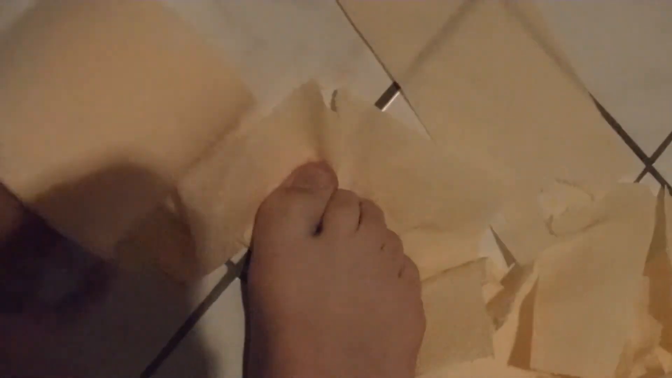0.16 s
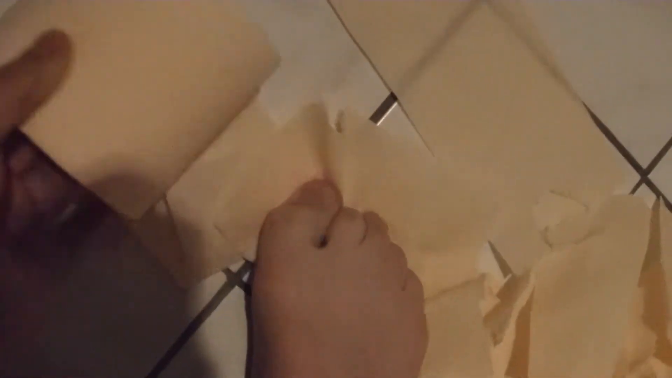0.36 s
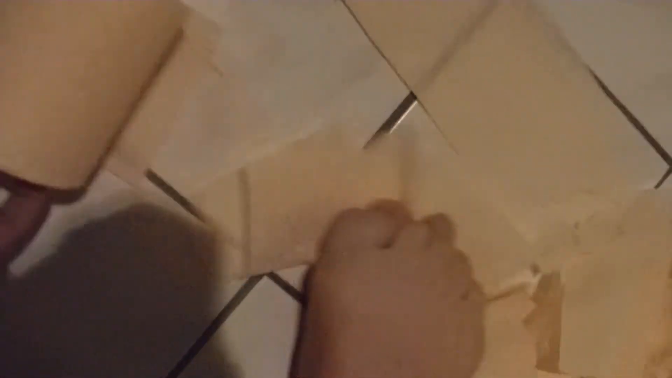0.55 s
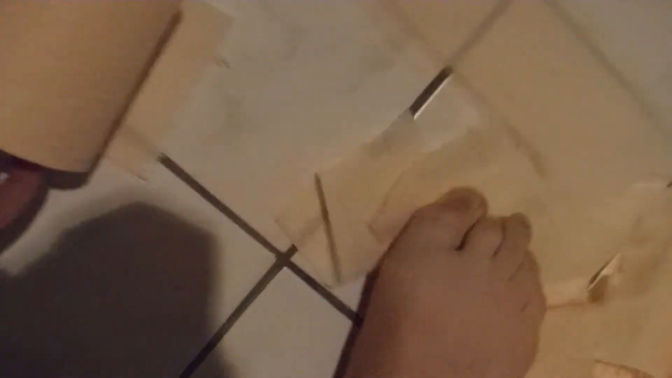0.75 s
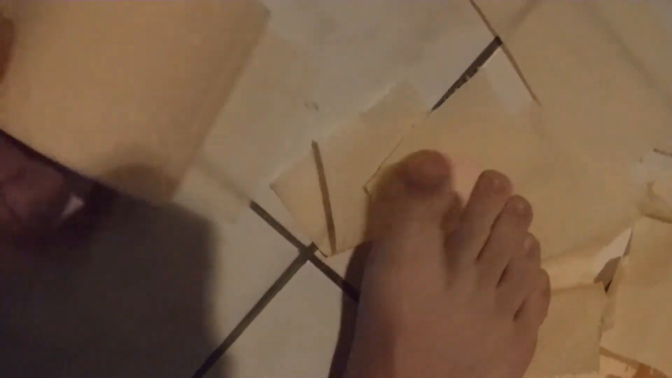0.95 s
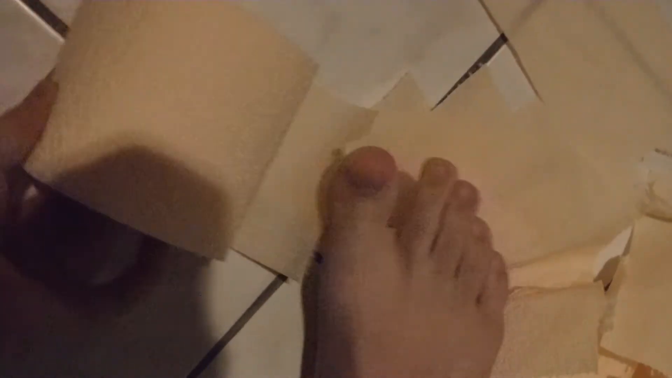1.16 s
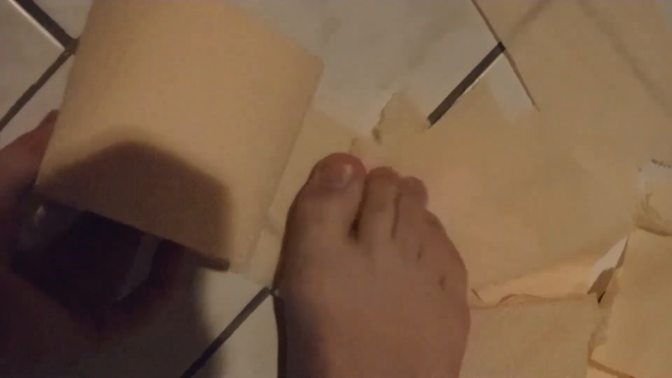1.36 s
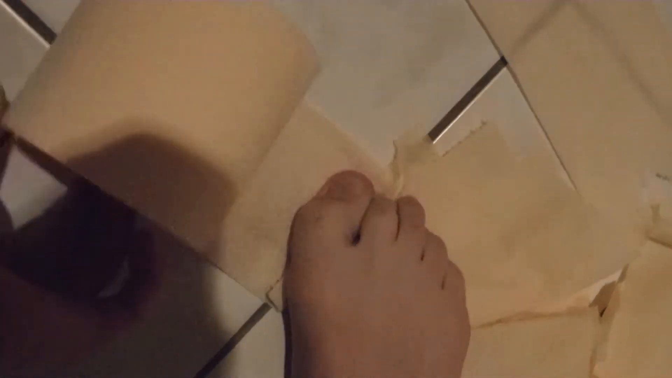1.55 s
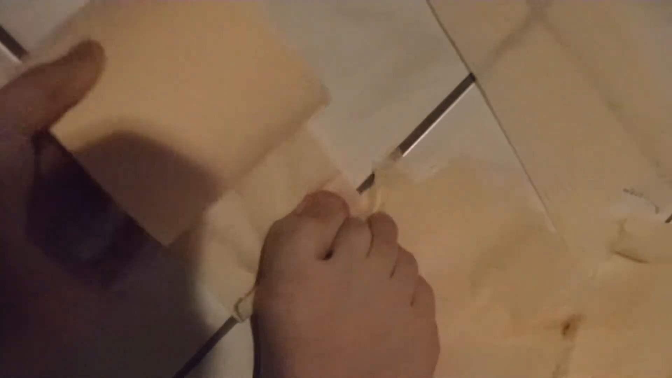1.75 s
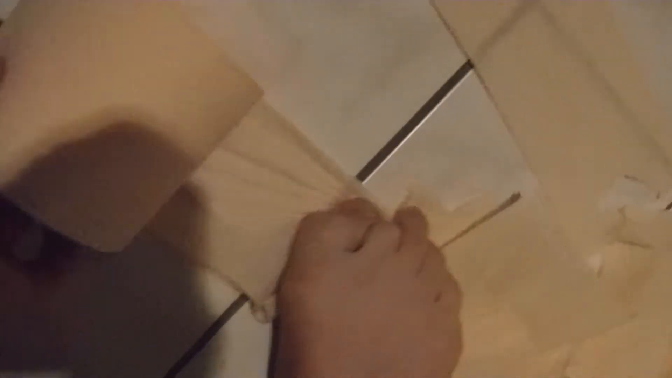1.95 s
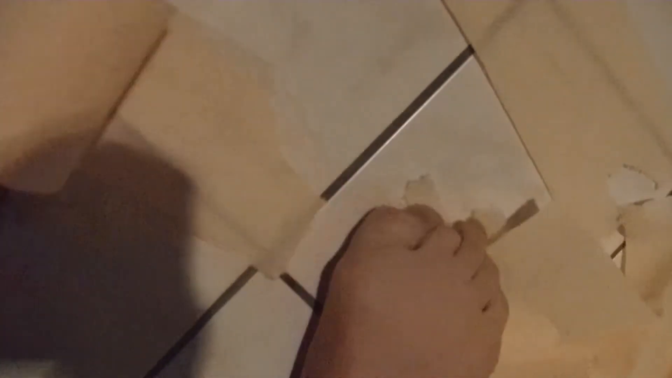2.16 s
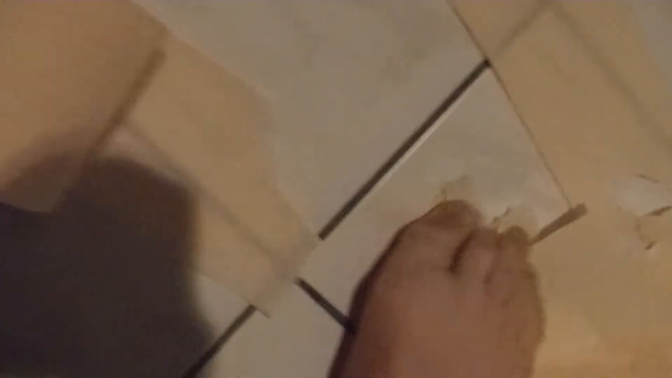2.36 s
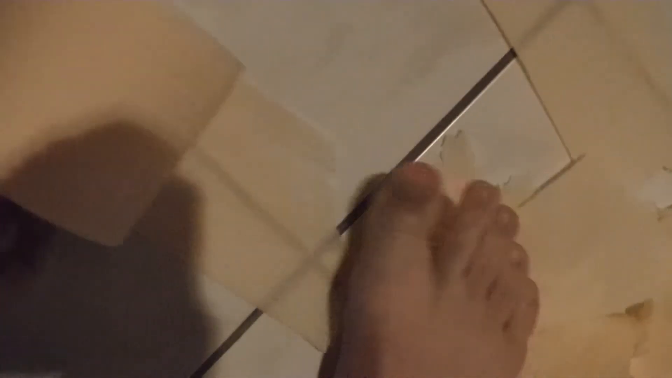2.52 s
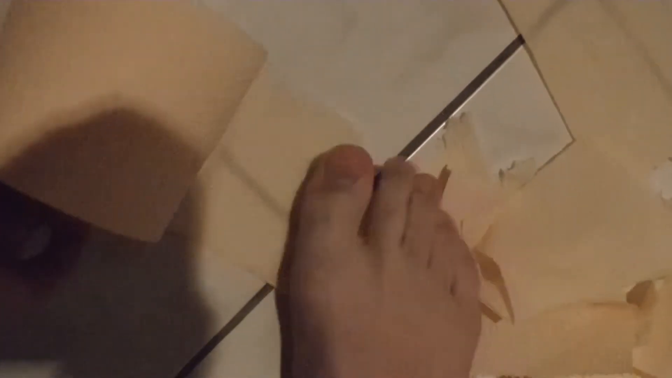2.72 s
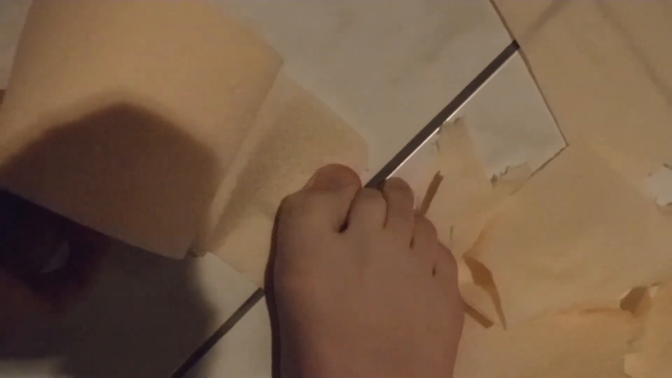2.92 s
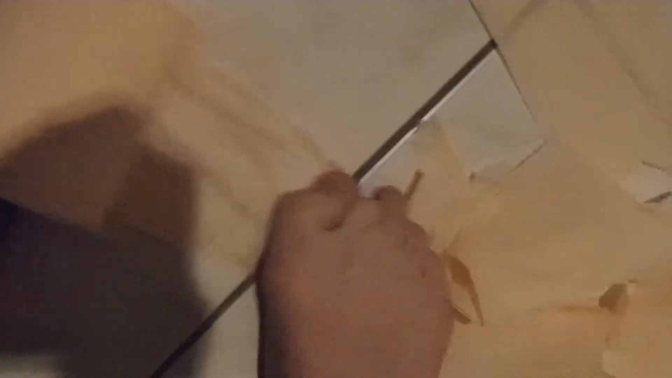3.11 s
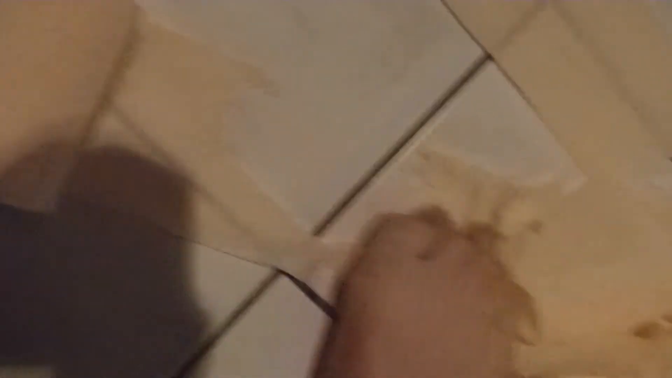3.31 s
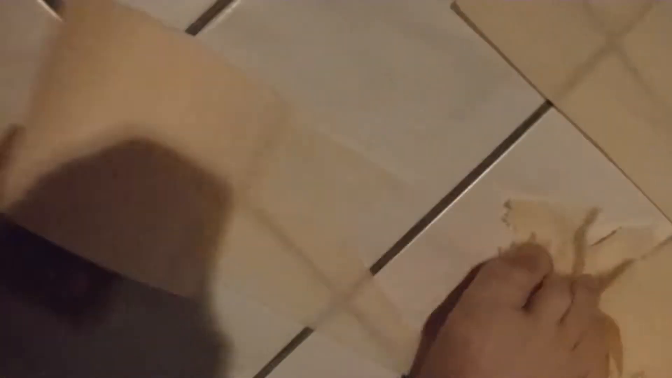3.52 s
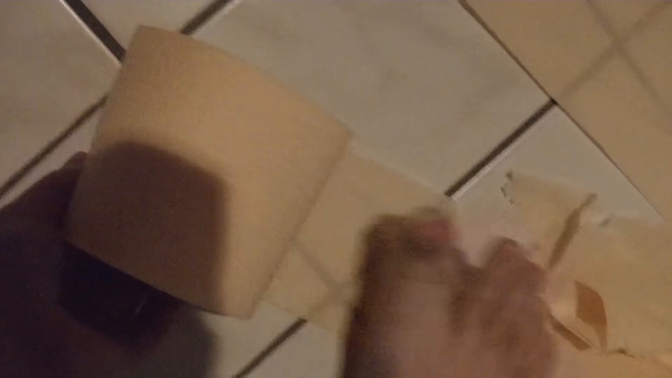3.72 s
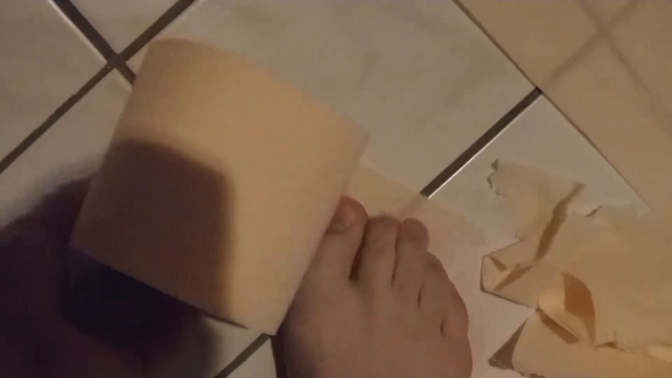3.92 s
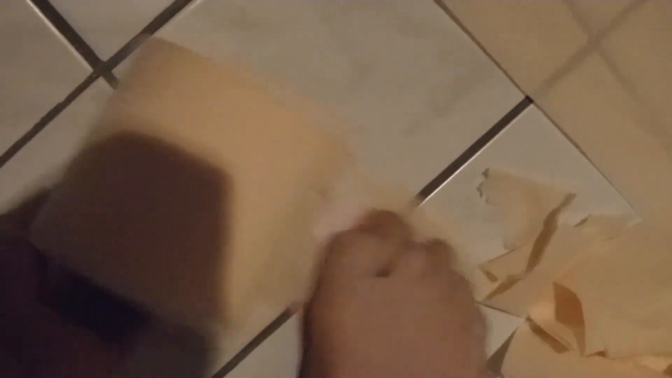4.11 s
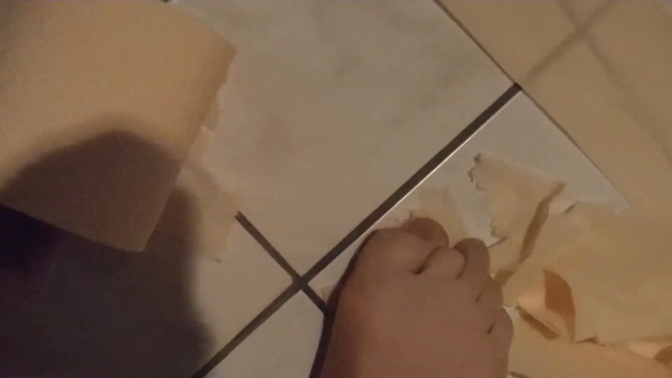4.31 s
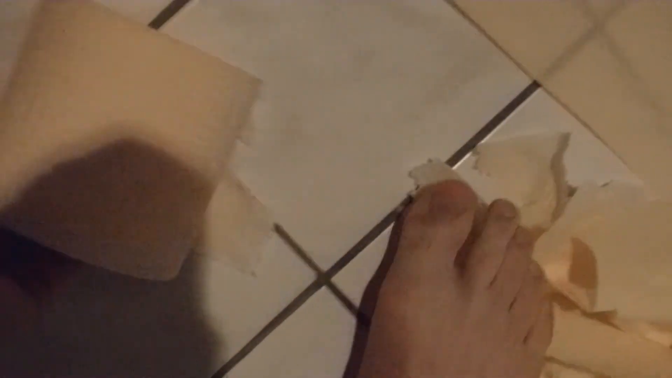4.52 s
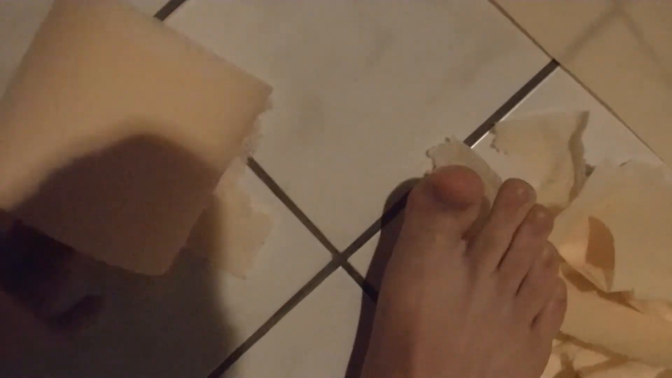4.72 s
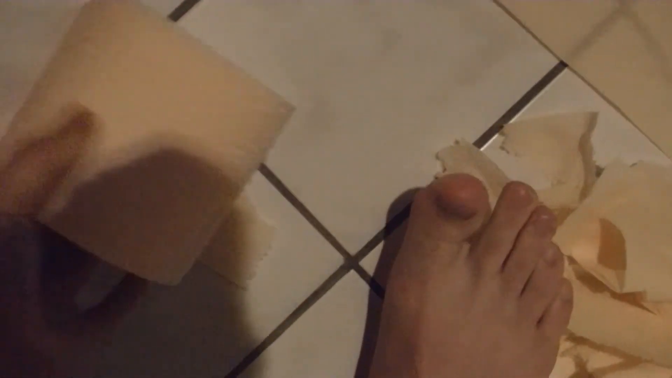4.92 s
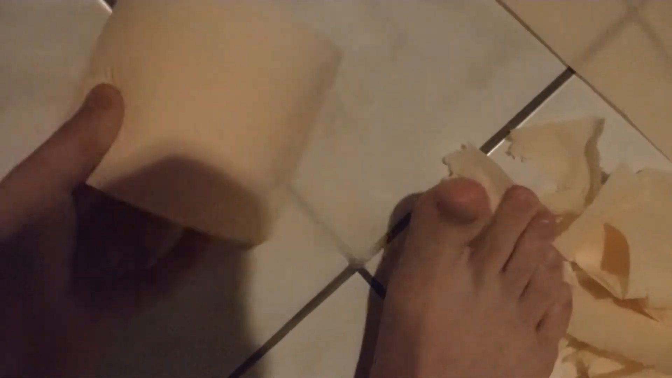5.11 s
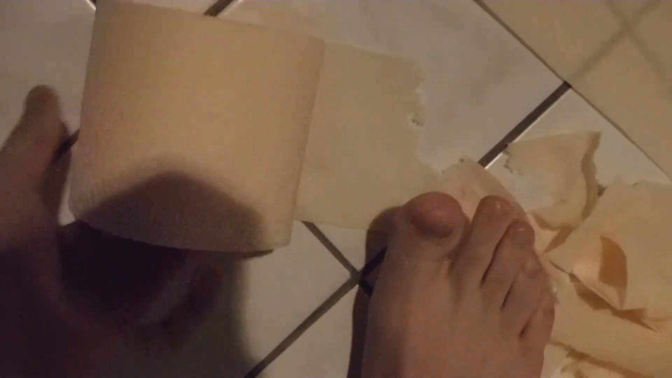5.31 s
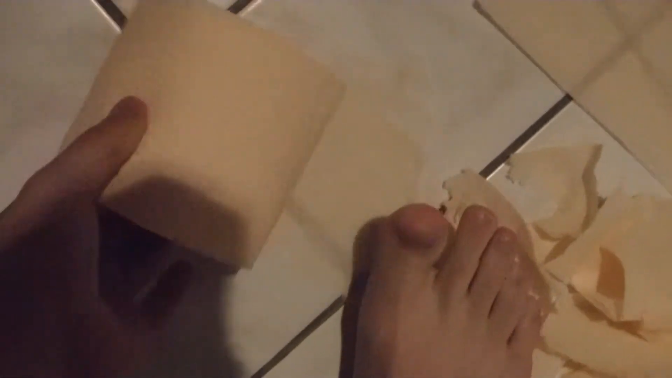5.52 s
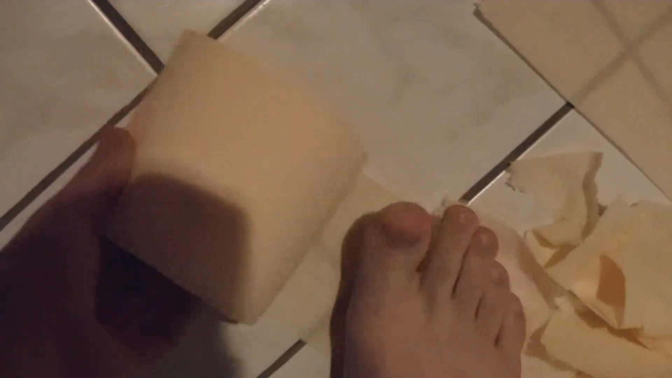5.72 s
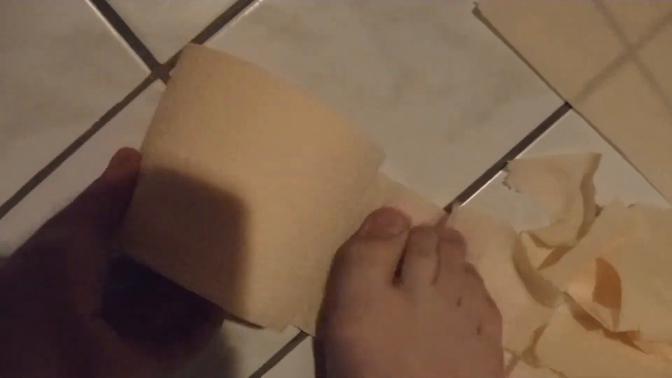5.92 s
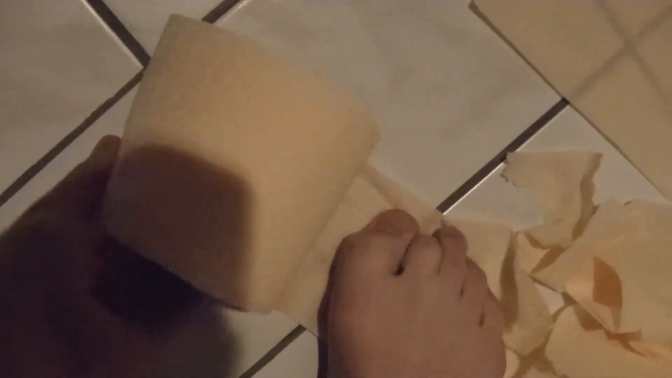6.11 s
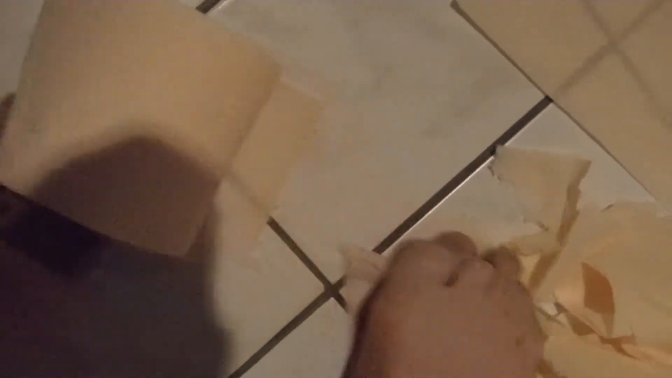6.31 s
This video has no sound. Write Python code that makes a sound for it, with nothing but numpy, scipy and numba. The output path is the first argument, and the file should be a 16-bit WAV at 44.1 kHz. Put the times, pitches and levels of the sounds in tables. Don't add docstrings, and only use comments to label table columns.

```python
import sys
import numpy as np
from scipy import signal
from scipy.fft import rfft, irfft
from scipy.io import wavfile
from scipy.ndimage import uniform_filter1d
from numba import njit

SR = 44100
rng = np.random.default_rng(int(sys.argv[2]) if len(sys.argv) > 2 else 0)


def to_linear_factor(level_db):
    exponent = np.asarray(level_db, float) / 20
    return 10 ** exponent


def dump(signal):
    limited = np.clip(np.atleast_2d(signal).T, -1, 1)
    pcm = np.round(limited * 32767).astype(np.int16)
    wavfile.write(sys.argv[1], SR, pcm)


N = 284886

BRIGHT_SHARE = (-.51, -.15, .2, .51)


def colour(x, points):
    hz, db = np.transpose(points)
    log_hz = np.log(np.fft.rfftfreq(2048, 1 / SR) + 1)
    log_gain = np.interp(log_hz, np.log(hz), db) * np.log(10) / 20
    ceps = irfft(log_gain)
    ceps[1:1024] *= 2
    ceps[1025:] = 0
    impulse = irfft(np.exp(rfft(ceps)))
    return signal.oaconvolve(x, impulse)[:len(x)]


def band(x, lo_hz, hi_hz):
    return signal.sosfilt(signal.butter(2, (lo_hz, hi_hz), "band", fs=SR, output="sos"), x)


def ring(x, modes):
    return sum(to_linear_factor(db) * signal.lfilter(*signal.iirpeak(hz, hz / width, SR), x) for hz, width, db in modes)


def steep(x, modes):
    return sum(ring(ring(x, [mode]), [(*mode[:2], 0)]) for mode in modes)


def unit(x):
    return x / np.sqrt(np.mean(x ** 2))


def walk(rate):
    hold = int(SR / rate)
    levels = np.repeat(rng.standard_normal(N // hold + 1), hold)
    return 1.19 * uniform_filter1d(levels, hold)[:N]


def slopes(t, peak_s, rise_db_s, fall_db_s):
    return -rise_db_s * np.maximum(peak_s - t, 0) - fall_db_s * np.maximum(t - peak_s, 0)


def hiss():
    # frequency in Hz, hiss density in dB per Hz.
    hiss_colour = [(22, -24.5), (160, -8), (235, 0), (1000, 1.5), (2000, -0.5), (3000, -6.5), (5000, -7.5),
                   (8000, -18), (12000, -16), (15800, -24)]
    # frequency in Hz, width in Hz, level in dB.
    murmur_modes = [(98, 9.4, -6), (165.6, 9.7, -5), (233, 3.5, 10.5), (303, 12, -1), (380, 22, -5)]
    hiss_db, murmur_db = -61, -75.5
    mid, side = (unit(colour(rng.standard_normal(N), hiss_colour)) for _ in range(2))
    rumble = to_linear_factor(murmur_db) * unit(ring(rng.standard_normal(N), murmur_modes))
    return to_linear_factor(hiss_db) * np.array([mid + 1.48 * side, mid - 1.27 * side]) + rumble


def motor():
    # start in seconds, length in seconds, level in dB.
    runs = [(0.066, 0.194, -2.5), (0.33, 0.053, -1), (0.45, 0.162, 0), (0.666, 0.057, 2),
            (0.83, 0.064, 0.5), (0.983, 0.127, -0.5), (1.23, 0.15, -1), (1.544, 0.045, 1.5),
            (1.64, 0.07, -1), (1.858, 0.041, 2), (2.39, 0.197, 0), (2.688, 0.055, -4), (2.775, 0.05, 0),
            (3.009, 0.093, -1), (3.106, 0.11, 2.5), (3.502, 0.038, 1.5), (3.623, 0.077, -1.5),
            (3.764, 0.024, 0), (3.839, 0.031, -3), (3.912, 0.09, -2), (4.292, 0.13, -3), (4.473, 0.078, 3),
            (4.852, 0.018, 1), (5.022, 0.038, 4), (5.162, 0.053, 7), (5.269, 0.047, 2), (5.41, 0.062, 1.5),
            (5.59, 0.095, 0), (5.978, 0.17, -3), (6.383, 0.037, 0.5)]
    # frequency in Hz, width in Hz, level in dB.
    body_modes = [(2120, 230, -1.5), (3990, 400, -1.5), (9610, 620, 1.1), (11500, 550, -5), (6600, 410, -8)]
    motor_db, step_hz, tick_db = -61.5, 71.6, 7
    frame_s, first_tick_s = .04, .03
    t = np.arange(N) / SR
    running = sum(to_linear_factor(db) * ((t > s) & (t < s + length)) for s, length, db in runs)
    steps = 1 + 0.14 * np.cos(2 * np.pi * step_hz * (t - first_tick_s))
    ticks = to_linear_factor(tick_db) * np.exp(-((t - first_tick_s + 0.003) % frame_s) / .003)
    tick_strength = .75 + .4 * uniform_filter1d(running, size=2600)
    drive = uniform_filter1d(running, size=90) * steps + ticks * tick_strength
    shake, other = (unit(steep(drive * rng.standard_normal(N), body_modes)) for _ in range(2))
    return to_linear_factor(motor_db) * np.array([shake + .5 * other, shake - .5 * other])


@njit
def walls(x, lags, gain, damp):
    line, soft, out = np.zeros((8, 4096)), np.zeros(8), np.zeros((2, len(x)))
    for i in range(len(x)):
        total = 0.
        for k in range(8):
            soft[k] += (1 - damp) * (gain[k] * line[k, (i - lags[k]) & 4095] - soft[k])
            total += soft[k]
            out[k % 2, i] += soft[k]
        for k in range(8):
            line[k, i & 4095] = x[i] + soft[k] - total / 4
    return out


def tiles(x):
    t60_s, damp, room_db = 0.27, .2, -14.5
    lags = np.array([331, 457, 563, 677, 811, 953, 1093, 1259])
    gain = to_linear_factor(-60 * lags / SR / t60_s)
    return to_linear_factor(room_db) * walls(x + 1e-18, lags, gain, damp)


def rubs():
    # start in seconds, length in seconds, resonance in Hz, width in Hz, level in dB.
    rub_rows = [(0.051, 0.073, 6600, 900, -53.5), (0.139, 0.076, 4880, 148.1, -50),
                (0.163, 0.034, 9600, 6480, -44.5), (0.339, 0.012, 4050, 320, -50),
                (.44, .09, 4120, 500, -53), (0.768, 0.041, 3450, 55.56, -64), (1.41, 0.13, 6600, 830, -59),
                (1.541, .03, 11100, 8000, -52), (1.758, 0.11, 1346, 220, -55),
                (2.297, 0.015, 9300, 9100, -33), (2.376, 0.46, 1377, 200, -62),
                (2.398, 0.47, 550, 220, -65), (4.643, .05, 6500, 1300, -54),
                (4.639, 0.06, 11900, 3200, -49), (4.72, .22, 1390, 320, -57), (4.745, 0.11, 301, 40, -67),
                (3.16, 0.2, 238, 80, -66), (6.213, 0.12, 233, 30, -58), (3.144, 0.056, 1290, 260, -41),
                (4.834, 0.11, 6200, 2200, -63), (5.14, 0.086, 6600, 900, -59)]
    out = np.zeros(N)
    for s, length, hz, width, db in rub_rows:
        count = int(length * SR)
        grit = rng.standard_normal(SR // 2)[:count] * signal.windows.tukey(count, .7)
        out[int(s * SR):][:count] += to_linear_factor(db) * unit(steep(grit, [(hz, width, 0)]))
    return out * to_linear_factor(1.6 * walk(70))


def rustle_power(t, layer):
    # time in seconds, effort in dB, brightness in dB.
    handling = [(0, -53, 3), (.1, -56, 14), (.29, -59, 7), (.7, -62, 11), (1.08, -65, 1), (1.33, -68, 3),
                (1.62, -63, 8), (2.02, -58, 8), (2.37, -57, 3), (2.65, -64, -2.1), (3.0, -73, 12),
                (3.5, -62, 8), (3.75, -72, 9), (4.0, -71, 3), (4.45, -59, 5), (4.92, -65, -5),
                (5.37, -72, 11), (6.46, -62, 13)]
    # loudest moment in seconds, level in dB,
    # seconds to fade 10 dB, brightness in dB, body in dB.
    swishes = [(.18, -46, .07, 10, -3), (.47, -53, .07, 9, 1.5), (.83, -56, .15, 3, -1.5),
               (1.44, -56, .05, 13, .1), (1.49, -58, .05, 11, 1.5), (1.7, -57, .08, 1.1, -1.5),
               (1.8, -54, .06, 5, 1.5), (1.89, -54.5, .1, 7, 1.1), (2.78, -63, .05, -5, 1.5),
               (3.065, -53, .035, 3, 1.1), (3.27, -44, .07, 3, 1.5), (3.37, -50, .07, 6, .1),
               (4.1, -49, .042, 6, .6), (4.3, -60, .05, 12, -2.1), (4.518, -53, .04, 14, 5),
               (4.83, -62, .11, -10, 4), (5.04, -57, .07, 8, 3), (5.11, -59, .05, 13, -1.1),
               (5.19, -54, .06, 12, -2.1), (5.53, -57, .08, 13, 3.5), (5.66, -53.5, .04, 13, -1.5),
               (5.74, -62, .04, 14, -1.5), (5.97, -60, .04, 8, 2.1), (6.12, -52.5, .045, 5, 2.1)]
    # peak in seconds, level in dB, seconds to fade 10 dB,
    # brightness in dB, body in dB.
    creases = [(.345, -54, .03, 11, -2.1), (.494, -46, .035, 5, 3), (1.09, -61, .09, -13, -4),
               (1.205, -63, .02, 14, .1), (1.268, -57, .03, 12, -2.1), (1.54, -54, .04, 14, 2.1),
               (2.05, -47, .02, -3, .1), (2.302, -49, .045, 14, -3), (3.352, -49, .008, 9, .1),
               (3.379, -49, .008, 12, -2.1), (3.428, -51, .03, 4, 1.1), (3.614, -61, .04, 1.1, .1),
               (3.703, -61, .02, 3, 1.1), (4.125, -46, .012, 8, 1.1), (4.368, -56, .06, 7, 5),
               (4.6, -61, .04, 12, 3), (4.65, -58, .05, 26, -3), (4.732, -51, .05, 2.1, .1),
               (4.976, -57, .015, 1.1, .1), (6.196, -47, .03, -1.1, 3)]
    layer_db = (.1, 2.5, -.6, .1)[layer]
    body_share = (0, 1, 1, 0)[layer]
    share = BRIGHT_SHARE[layer]
    s, db, bright_db = np.transpose(handling)
    levels = [np.interp(t, s, db + share * bright_db)]
    for rows, rise in (swishes, 1), (creases, .2):
        for s, db, fade, bright_db, body_db in rows:
            peak_db = db + share * bright_db + body_share * body_db
            levels.append(peak_db + slopes(t, s, 10 / fade / rise, 10 / fade))
    return to_linear_factor(2 * (np.array(levels) + layer_db)).sum(0)


def rip_power(t, layer):
    # snap in seconds, jerk in dB, tear length in seconds, tear in dB, brightness in dB.
    rips = [
        (0.536, -35, .035, -35.5, -8),
        (2.065, -30, .055, -36, -3),
        (3.15, -33.5, .12, -39.5, 1),
        (4.143, -29, .05, -35, -.6),
        (6.216, -31, .073, -36, -7),
    ]
    layer_db = (.6, .6, -3.5, .1)[layer]
    jerk_fall_db_s, tear_sag_db_s = 400, 45
    tear_fall_db_s = (220, 290, 270, 260)[layer]
    strain_db, strain_rise_db_s, snap_s = -15, 400, .005
    levels = []
    for s, jerk_db, length, tear_db, bright_db in rips:
        strain = jerk_db + strain_db + slopes(t, s, strain_rise_db_s, 20 / snap_s)
        snap = slopes(t, s, 20 / snap_s, 0) + BRIGHT_SHARE[layer] * bright_db
        sag = slopes(t, s, 0, tear_sag_db_s)
        tear = tear_db + sag + slopes(t, s + length, 0, tear_fall_db_s)
        jerk = jerk_db + slopes(t, s, 0, jerk_fall_db_s)
        levels += [strain, snap + tear, snap + jerk]
    return to_linear_factor(2 * (np.array(levels) + layer_db)).sum(0)


def grains(rate, spread_db):
    size_db = spread_db * np.minimum(rng.exponential(size=N), 4)
    return (rng.random(N) < rate / SR) * rng.standard_normal(N) * to_linear_factor(size_db)


def paper():
    # frequency in Hz, density in dB per Hz.
    sheet = [(120, -40.5), (220, -28), (380, -13.5), (560, -9), (760, -3), (1000, -3), (1350, -5.5),
             (1750, -9.3), (2400, -7.5), (4800, -7.5), (6600, -11.5), (11400, -13.5), (15800, -17.5)]
    layer_edges_hz = (220, 900, 2400, 5200, 15500)
    grains_per_s = (1200, 2000, 6000, 10000)
    grain_spread_db, patchy_db = (2.1, 2.34, 1.8, 1.4), (1.3, 1.67, 1.7, 1.1)
    ms = np.arange(0, N / SR, .001)
    out = np.zeros((2, N))
    for k in range(4):
        effort_db = 10 * np.log10(rustle_power(ms, k) + rip_power(ms, k))
        gain = to_linear_factor(np.interp(np.arange(N) / SR, ms, effort_db) - 1.0)
        edges_hz = np.geomspace(*layer_edges_hz[k:k + 2], 4)
        patches = [to_linear_factor(patchy_db[k] * walk(30)) for _ in range(3)]
        for port in range(2):
            fibres = colour(grains(grains_per_s[k], grain_spread_db[k]), sheet)
            parts = [patch * band(fibres, lo, hi) for patch, lo, hi in zip(patches, edges_hz, edges_hz[1:])]
            out[port] += gain * unit(parts[0] - parts[1] + parts[2])
    return out


def pops():
    # time in seconds, peak in dB, pop pitch in Hz, crack against pop in dB, swings.
    perforations = [(0.493, -28.5, 1070, -15, 0.97), (0.535, -19.5, 1260, -5, 0.65),
                    (0.543, -18, 930, -13, 0.6), (0.559, -19, 834, -9, 0.7), (2.059, -25, 1130, -6, 0.8),
                    (2.064, -20, 692, -17, 0.94), (2.068, -25, 650, -4.5, 1.01),
                    (2.075, -27, 506, 2.1, 0.77), (2.096, -31, 770, -3, 0.29),
                    (2.108, -23, 1080, -11, 0.91), (3.144, -30, 1110, -15, 0.88),
                    (3.149, -26.5, 664, 6, 0.49), (3.164, -29, 1240, -13, 0.8), (3.264, -30, 770, -8, 0.51),
                    (3.425, -38, 1190, -0.6, 0.8), (4.14, -18, 1250, -14, 0.96),
                    (4.146, -13, 820, -9, 1.01), (4.152, -17.5, 710, 1.5, 0.69),
                    (4.158, -14, 770, -21, 1.01), (4.19, -19, 1050, -14, 0.55),
                    (6.194, -33, 1000, -12, 0.8), (6.213, -11, 910, -15, 0.7),
                    (6.218, -16, 670, -15.5, 0.37)]
    out, t = np.zeros(N + 900), np.arange(900) / SR
    crack = unit(band(rng.standard_normal(N + 900), 2500, 14000))
    for s, db, hz, crack_db, swings in perforations:
        at = int((s + .001) * SR) + np.arange(len(t))
        age = t * hz / swings
        swing = np.sin(2 * np.pi * hz * t) * age * np.exp(1 - age)
        spit = to_linear_factor(crack_db - 11.5) * crack[at] * (t / .0015) * np.exp(1 - t / .0015)
        out[at] += to_linear_factor(db) * (swing + spit)
    return out[:N]


def scene():
    # frequency in Hz, side against mid in dB.
    spread = [(150, -9), (400, -9), (1000, -9.5), (3000, -9.5), (8000, -2.5), (14000, 0.5)]
    # frequency in Hz, left minus right in dB.
    lean = [(150, 1), (700, 2.5), (2000, 1.6), (5000, -.9), (12000, -1.3)]
    # frequency in Hz, width in Hz, level in dB.
    room_modes = [(163.4, 3.9, -5), (233, 2.6, 10.5), (309, 4.7, 6), (375, 9, 1), (505.5, 8.3, -4.5)]
    mic_low_hz, room_width = 215, .6
    mid, other = paper()
    low_cut = signal.butter(4, mic_low_hz, "high", fs=SR, output="sos")
    mid = signal.sosfilt(low_cut, mid + pops() + rubs())
    near, far = tiles(mid)
    side = colour(other, spread) + room_width * colour(far, spread)
    mid = mid + near + ring(mid, room_modes)
    left = colour(mid + side, [(hz, db / 2) for hz, db in lean])
    right = colour(mid - side, [(hz, -db / 2) for hz, db in lean])
    return np.array([left, right]) + motor() + hiss()


def roll_off(x):
    return signal.sosfilt(signal.butter(12, 16010, fs=SR, output="sos"), x)


def record(dry):
    top_cut = signal.ellip(16, .3, 90, 15740, fs=SR, output="sos")
    return roll_off(signal.sosfilt(top_cut, dry))


dry = scene()
out = record(dry)
dump(out)
```